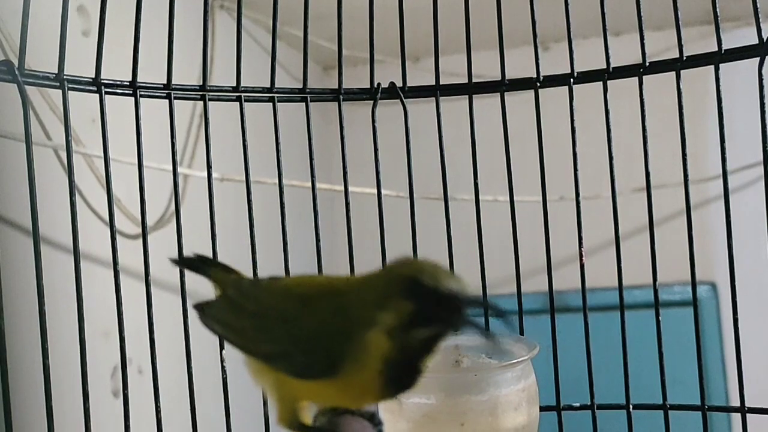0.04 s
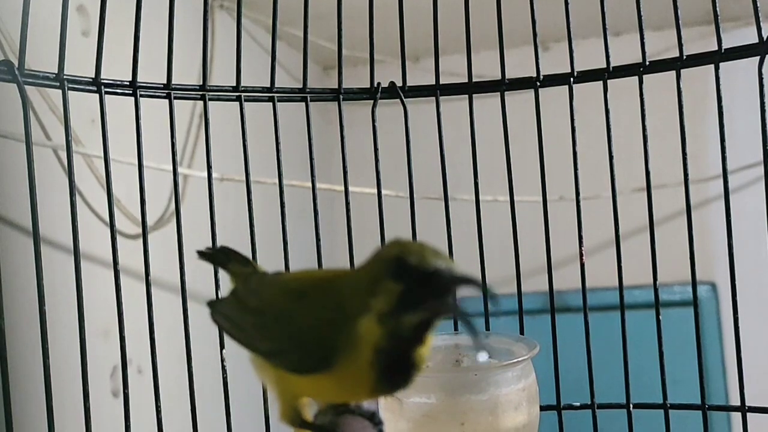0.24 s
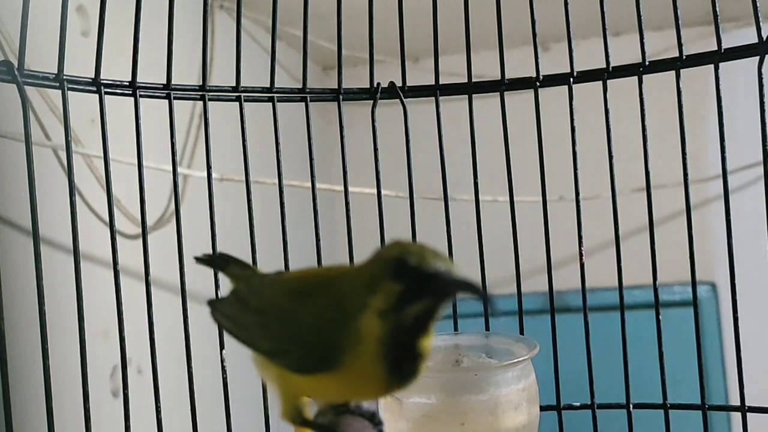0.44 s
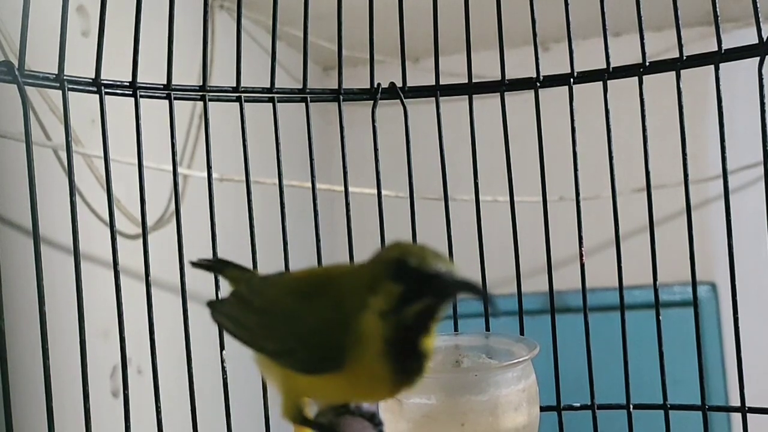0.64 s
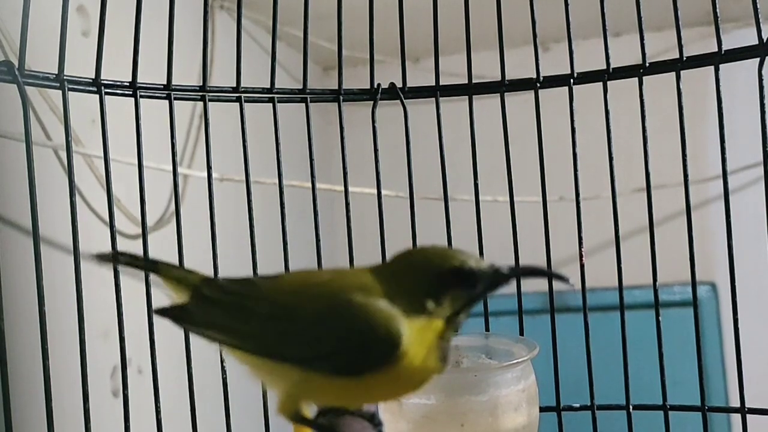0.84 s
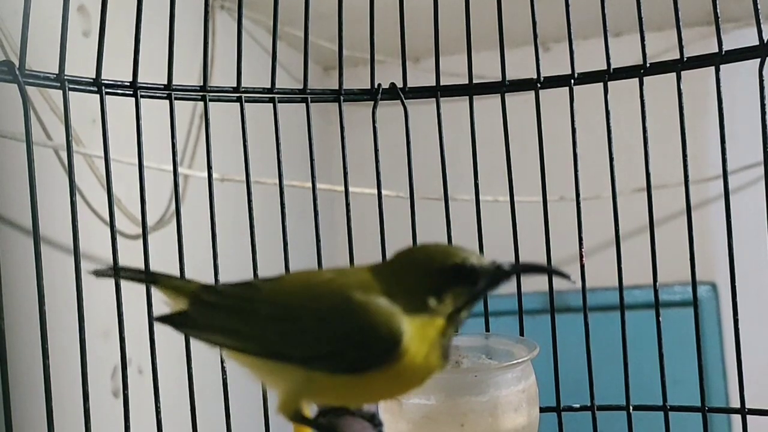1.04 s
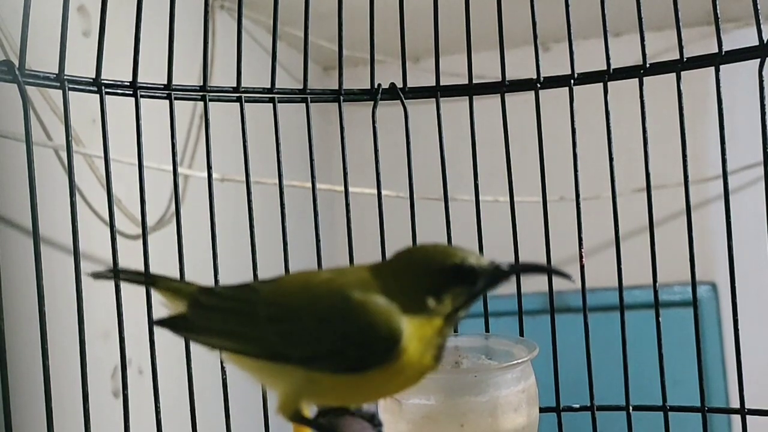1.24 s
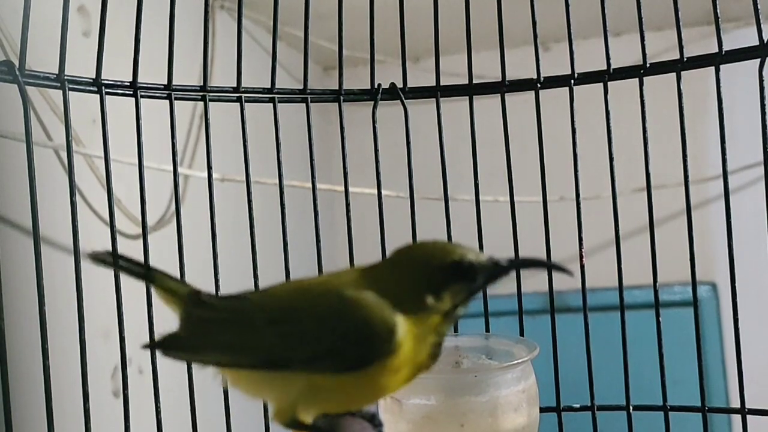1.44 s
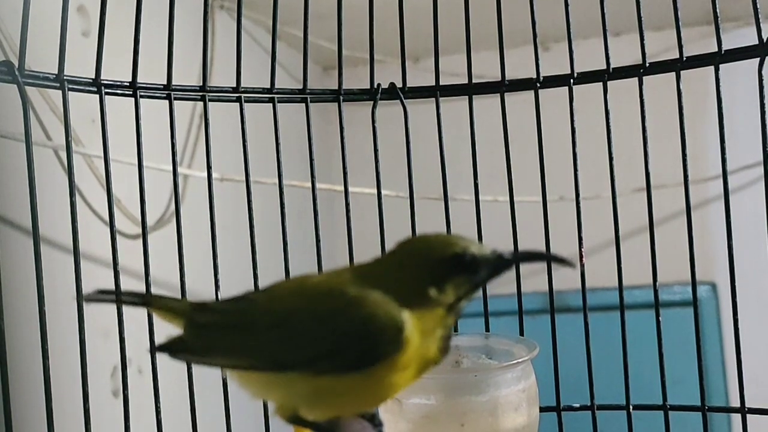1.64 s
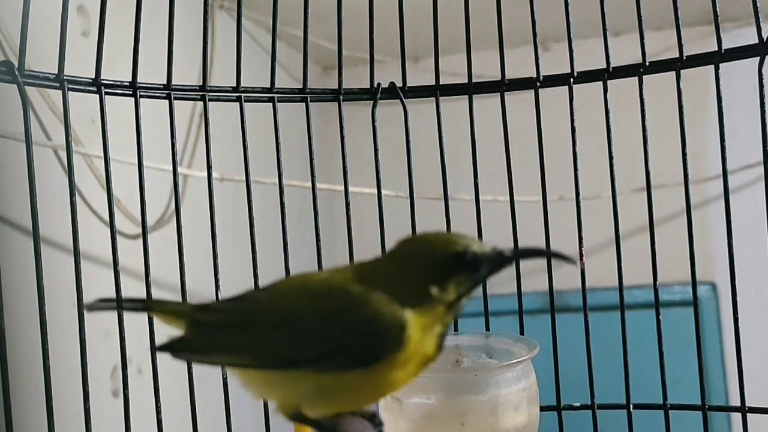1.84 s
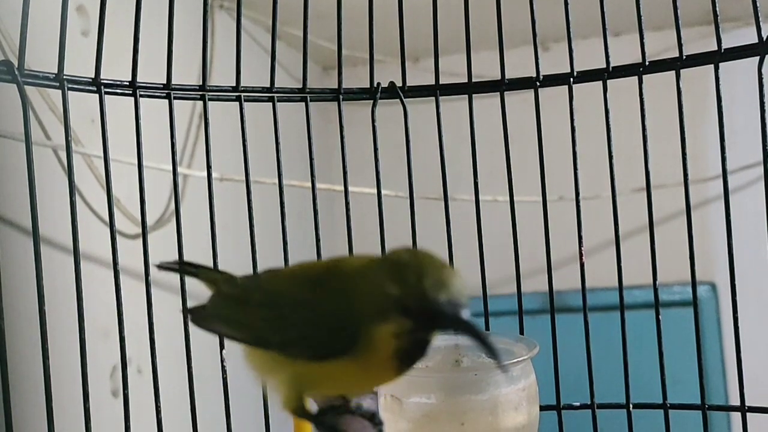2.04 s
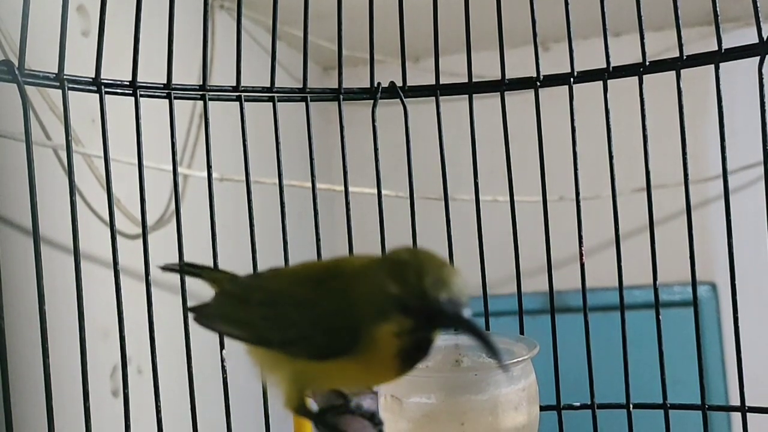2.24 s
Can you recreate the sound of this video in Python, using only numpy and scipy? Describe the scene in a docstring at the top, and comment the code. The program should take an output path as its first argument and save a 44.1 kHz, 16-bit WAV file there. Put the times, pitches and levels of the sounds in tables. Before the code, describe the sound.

Small caged bird squawks harshly once, pauses, then utters a loose string of quick falling chips

```python
"""Over room air and a low hum, thin faint whistles begin, and more come later between and over the chips.
Two tiny snaps lead into a caged sunbird's loud squawk: partials shaken into a rasp, clearer in the middle.
After a pause come nine short chips, each opening with rasping noise and turning into a falling tone.
A small hard-walled room adds early echoes and a fading tail to every bird note and whistle."""
import sys
import numpy as np
from scipy import signal
from scipy.fft import rfft, irfft, next_fast_len
from scipy.io import wavfile
from scipy.ndimage import uniform_filter1d, map_coordinates

SR = 44100
rng = np.random.default_rng(int(sys.argv[2]) if len(sys.argv) > 2 else 0)


def wrap_up_sound(samples):
    """Save the sound to the file named by the first command line argument, as 16-bit audio."""
    columns = np.atleast_2d(samples).T
    # keep every value between -1 and 1, then stretch to whole-number steps
    tamed = np.clip(columns, -1, 1)
    steps = np.round(tamed * 32767).astype(np.int16)
    wavfile.write(sys.argv[1], SR, steps)


N = 99225  # samples: 2.25 s


def amp(db):
    """Decibels to a plain factor."""
    return 10 ** (np.asarray(db) / 20)


def unit(x):
    """Scale x to an average strength (rms) of 1."""
    return x / np.sqrt(np.mean(x ** 2) + 1e-20)


def along(points, hz):
    """Read a curve of (frequency, value) points, with frequency on a log axis."""
    f, v = np.transpose(points)
    return np.interp(np.log(hz + 1), np.log(f + 1), v)


def clock():
    """The time of every sample in seconds."""
    return np.arange(N) / SR


def curves(rows):
    """One value per sample for each column after the time."""
    s, *cols = np.transpose(rows)
    return [np.interp(clock(), s, c) for c in cols]


def ramp(u):
    """A smooth step from 0 to 1."""
    return np.sin(np.pi / 2 * np.clip(u, 0, 1)) ** 2


def wobble(rate):
    """A smooth random curve through rate random points a second."""
    knots = rng.standard_normal(int(N * rate / SR) + 4)
    return map_coordinates(knots, [clock() * rate])


def filtered(x, response):
    """Change the strength and phase of each frequency in x by a response."""
    m = next_fast_len(N + SR // 2)
    hz = np.fft.rfftfreq(m, 1 / SR)
    return irfft(rfft(x, m) * response(hz), m)[..., :N]


def noise(spectrum):
    """Noise coloured by a (frequency, dB) curve, at rms 1."""
    return unit(filtered(rng.standard_normal(N), lambda hz: amp(along(spectrum, hz))))


def partials(pitch, multiples, gains, throat):
    """The voice organ's tone at rms 1: the throat weighs each partial at its momentary frequency."""
    phase = 2 * np.pi * np.cumsum(pitch) / SR
    k = multiples[:, None]
    below_limit = k * pitch < SR / 2
    weight = gains * amp(along(throat, k * pitch)) * below_limit
    return (weight * np.sin(k * phase)).sum(0) / np.sqrt((weight ** 2).sum(0) / 2)


def squawk():
    """Harsh at both ends, where every partial is shaken into a band; clears in the middle as the pitch arches."""
    # pitch of the voice: start_s, pitch_hz
    pitch_points = [(.235, 1640), (.29, 1655), (.312, 1820), (.328, 1844), (.338, 1946), (.37, 1973),
                    (.39, 2047), (.415, 2066), (.44, 2015), (.465, 1863), (.49, 1778)]
    # loudness of the voice: start_s, level_db
    level_points = [(.223, -59), (.231, -26.5), (.24, -17), (.286, -17), (.305, -20), (.345, -12.5),
                    (.372, -19.5), (.414, -15.5), (.455, -20), (.478, -19), (.493, -28), (.5, -55)]
    # roughness: start_s, rasp_over_tone_db, half_pitch_partials_db
    rough_points = [(.235, 12, -28), (.26, 7, -19.5), (.288, -2, -20.5), (.305, 5.5, 12), (.325, -8.5, 0),
                    (.35, -28.5, -54.5), (.385, -15.5, -6.5), (.408, -11, -12), (.435, 5.5, -8),
                    (.465, 2, -9), (.49, -1.5, -7)]
    # throat and open beak, for the tone: frequency_hz, gain_db
    tone_throat = [(900, -84.5), (1900, -18.5), (2600, -13.5), (3100, -3), (3500, -6), (3900, 11.5),
                   (4200, -2), (5000, 9.5), (6200, 3.5), (7000, -18), (8200, -29.5), (10000, -35),
                   (15000, -36.5)]
    # throat and open beak, for the rasp: frequency_hz, gain_db
    rasp_throat = [(300, -54.5), (1200, -32), (2000, -22.5), (2500, -15), (3200, -30), (3800, -7.5),
                   (5000, 0.5), (6000, -4), (6800, -8.5), (7500, -23.5), (9000, -42.5), (15000, -45)]
    jitter_share = 0.0201  # pitch unsteadiness at full roughness
    spread_hz, rasp_half_db = 620, -2  # how fast partials are shaken; half-pitch partials in the rasp

    (pitch,), (level_db,) = curves(pitch_points), curves(level_points)
    rasp_db, half_db = curves(rough_points)
    rough = amp(rasp_db) / np.hypot(1, amp(rasp_db))
    multiples = np.arange(1, 19) / 2
    halves = multiples[:, None] % 1 > 0
    shaky_pitch = pitch * (1 + jitter_share * rough * wobble(1500))
    tone = partials(shaky_pitch, multiples, np.where(halves, amp(half_db), 1), tone_throat)

    phase = 2 * np.pi * np.cumsum(pitch) / SR
    shaken = []
    for k in multiples:
        shake = wobble(spread_hz) + 1j * wobble(spread_hz)
        shaken.append(np.real(shake * np.exp(1j * k * phase)))
    mixed = (np.array(shaken) * np.where(halves, amp(rasp_half_db), 1)).sum(0)
    harsh = filtered(mixed, lambda hz: amp(along(rasp_throat, hz)))
    # The voice organ swings with bounded strength: even out the power over about 4 ms.
    harsh = harsh / np.sqrt(np.abs(uniform_filter1d(harsh ** 2, size=180)))
    sounding = (clock() > level_points[0][0]) & (clock() < level_points[-1][0])
    return sounding * amp(level_db) * (np.sqrt(1 - rough ** 2) * tone + rough * harsh)


def ticks():
    """Two tiny snaps as the voice catches: coloured noise that starts at once and dies fast."""
    # first snaps of the voice organ: start_s, level_db
    snaps = [(0.2243, -24), (0.2289, -36.5)]
    # colour of the snaps: frequency_hz, gain_db
    snap_colour = [(400, -26.5), (1400, -2), (2800, -11.5), (5500, 8), (7000, -4.5), (9000, -46.5),
                   (15000, -38)]
    t60_s = 0.021  # time to fade by 60 dB
    envelope = np.zeros(N)
    for start, level_db in snaps:
        age = np.abs(clock() - start)
        envelope += (clock() > start) * amp(level_db - 60 * age / t60_s)
    return envelope * noise(snap_colour)


def rasp(spectrum, flutter_hz, depth):
    """Chaotic motion of the voice organ: noise in fast uneven bursts."""
    uneven_hz = flutter_hz * (1 + .3 * wobble(200))
    beat = np.sin(2 * np.pi * np.cumsum(uneven_hz) / SR)
    return unit(noise(spectrum) * (1 + depth * beat))


def chips():
    """Each chip opens with a rasp, then locks into a tone whose steep fall eases into a steady slide."""
    # the chips: start_s, length_s, middle_of_fall_s (after the start), fall_time_s,
    # first_pitch_hz, last_pitch_hz (both before the steady slide),
    # level_db, rasp_db, octave_db (second partial), treble_db
    chip_rows = [ (0.99, .041, 0.024, 0.01186, 1740, 1508, -42.5, 5, -8, -5.5),
                 (1.115, 0.043, 0.027, .018, 3900, 2265, -33, -9, 3.5, -7.5),
                 (1.246, 0.042, .021, .010, 2576, 1712, -30.5, -7.5, 1.5, -4),
                 (1.423, 0.033, .021, .024, 2300, 1578, -25.5, -10, 3, -1.5),
                 (1.512, 0.043, .019, 0.0068, 2700, 2022, -24, -6, 7, -4.5),
                 (1.61, .032, .023, .016, 2450, 1844, -26.5, -6.5, 3.5, -2.5),
                 (1.801, 0.038, 0.022, 0.01806, 3083, 1554, -31.5, 1, 0, 2),
                 (1.865, .040, 0.026, 0.00736, 1972, 1665, -26.5, -3, 2.5, -5.5),
                 (2.061, 0.035, 0.025, 0.015, 2100, 1782, -26, -6, 1.5, 1.5)]
    # throat, for the tone: frequency_hz, gain_db
    tone_throat = [(1300, -8.5), (1800, -9), (2500, -6.5), (3300, -2), (4100, -4), (4900, -5),
                   (5800, -14.5), (7000, -22.5), (8500, -34), (11000, -31), (15000, -35)]
    # throat, for the rasp: frequency_hz, gain_db
    rasp_throat = [(400, -32), (1100, -39.5), (1700, -4), (3200, 5.5), (4300, 4), (5800, -6.5),
                   (7500, -24.5), (10000, -25), (12500, -31), (15000, -35)]
    attack_s, release_s = .009, .012
    tone_start, tone_rise = 0.27, 0.41  # shares of the length: when the tone sets in, how long it takes
    rasp_left = 0.35  # share of the rasp that stays under the tone
    jitter_share = .024  # pitch unsteadiness
    sag_hz_per_s = 3200  # steady slide under the main fall
    treble_hz = 6480  # the treble change is complete here and begins at half of this
    grain_db, grain_hz = 1.5, 494.4  # fast uneven flutter of the tone

    out = np.zeros(N)
    grit = rasp(rasp_throat, flutter_hz=412.2, depth=0.77)
    jitter = wobble(1800)
    grain = unit(amp(grain_db * wobble(grain_hz)))
    multiples = np.arange(1, 10)
    for start, length, middle, fall, first_hz, last_hz, level_db, rasp_db, octave_db, treble_db in chip_rows:
        span = slice(int(start * SR), int((start + length + release_s) * SR))
        t = clock()[span]
        from_middle = t - start - middle
        still_high = (1 - np.tanh(2 * from_middle / fall)) / 2
        pitch = last_hz + (first_hz - last_hz) * still_high - sag_hz_per_s * from_middle
        gains = np.where(multiples[:, None] == 2, amp(octave_db), 1)
        tone = partials(pitch * (1 + jitter_share * jitter[span]), multiples, gains, tone_throat)

        locked = ramp(((t - start) / length - tone_start) / tone_rise)
        rise = np.clip((t - start) / attack_s, 0, 1)
        fade = ramp((start + length - t) / release_s + .5)
        rasp_share = 1 - locked * (1 - rasp_left)
        chip = locked * grain[span] * tone + amp(rasp_db) * rasp_share * grit[span]
        hz = np.fft.rfftfreq(len(t), 1 / SR)
        shelf = amp(treble_db * ramp(hz / treble_hz * 2 - 1))
        out[span] += amp(level_db) * rise * fade * irfft(rfft(chip) * shelf, len(t))
    return out


def whistles():
    """Thin, soft, nearly level tones: single sine waves that swell and fade."""
    # the whistles: start_s, length_s, first_pitch_hz, last_pitch_hz, level_db, unsteadiness (share of pitch)
    whistle_rows = [(0.023, 0.13, 5180, 5140, -73, .006), (0.048, 0.25, 9250, 9230, -76.5, 0.0087),
                    (0.871, 0.089, 5380, 5620, -58, 0.0071), (0.929, 0.06, 5640, 5820, -63.5, 0.0081),
                    (.94, 0.072, 3780, 4140, -67, 0.012), (1.022, 0.072, 4354, 4244, -56, 0.0059),
                    (1.465, .06, 5750, 5764, -51.5, 0.063), (1.621, 0.064, 5660, 5650, -43, 0.03)]
    out = np.zeros(N)
    for start, length, first_hz, last_hz, level_db, unsteady in whistle_rows:
        u = np.clip((clock() - start) / length, 0, 1)
        pitch = (first_hz + (last_hz - first_hz) * u) * (1 + unsteady * wobble(700))
        swell = np.sqrt(2 * np.abs(np.sin(np.pi * u)))
        out += amp(level_db) * swell * np.sin(2 * np.pi * np.cumsum(pitch) / SR)
    return out


def background():
    """Room air, partly alike left and right in the bass, with a low drone and a deep, almost steady hum."""
    # colour of the room air: frequency_hz, level_db (per Hz)
    air_colour = [(15, -31), (25, 3.5), (67, -6.5), (176, -11), (354, -7.5), (833, -12.5), (2180, -18.5),
                  (3350, -22), (4500, -24.5), (5140, -23.5), (7680, -39), (9270, -48), (15000, -88)]
    # loudness of the air and drone: start_s, level_db
    air_level = [(0, -54.5), (.45, -54.5), (.6, -61), (.75, -60.5), (.9, -56.5), (1.5, -55.5), (2.25, -53)]
    # how alike left and right are: frequency_hz, likeness (0 to 1)
    alike = [(50, 0.38), (300, 0.63), (700, 0.0033), (2000, 0)]
    # colour of the room's low drone: frequency_hz, gain_db
    drone_colour = [(120, -80.5), (200, -17.5), (268, -4), (305, -13), (350, -0.5), (450, -46.5),
                    (900, -88)]
    air_low_hz, drone_db = 70, -9.5  # bass roll-off of the air; drone against the air
    hum_hz, hum_db = 48.2, -60.5
    waver_db, drift_rad = .7, .1  # slight unsteadiness of the hum's level and phase

    def mid_side(hz):
        """Shares of the common and the opposite part that give the wanted likeness."""
        turn = np.arccos(np.clip(along(alike, hz), -1, 1)) / 2
        return np.array([np.cos(turn), np.sin(turn)])

    mid, side = filtered(np.array([noise(air_colour), noise(air_colour)]), mid_side)
    stereo = unit(np.array([mid + side, mid - side]))
    air = filtered(stereo, lambda hz: hz / np.hypot(hz, air_low_hz))
    hum_level = np.sqrt(2) * amp(hum_db + waver_db * wobble(5.13))
    hum = hum_level * np.sin(2 * np.pi * hum_hz * clock() + drift_rad * wobble(10))
    drone = amp(drone_db) * noise(drone_colour)
    return amp(curves(air_level)[0]) * (air + drone) + hum


def in_room(x, room_db, pan_db, lead_s):
    """Direct sound, louder and earlier on the left if asked, plus early wall echoes and the room's tail."""
    # how long the tail rings: frequency_hz, t60_s (time to fade by 60 dB)
    ring_times = [(300, 0.95), (2000, 0.32), (5000, 0.32), (8000, 0.45), (15000, 0.1)]
    wall_db, wall_t60_s = -13, .06  # early echoes of the near walls
    hz, t, z = signal.stft(rng.standard_normal((2, SR // 2)), SR, nperseg=256)
    decay = amp(-60 * t / along(ring_times, hz)[:, None])
    tail = signal.istft(z * decay, SR, nperseg=256)[1]
    age = np.arange(tail.shape[1]) / SR
    walls = rng.standard_normal(tail.shape) * amp(-60 * age / wall_t60_s) * ramp(age / 0.001)
    tail = tail * ramp(age / 0.004)
    tail_part = amp(room_db) * tail / np.linalg.norm(tail[0])
    wall_part = amp(wall_db) * walls / np.linalg.norm(walls[0])

    sides = np.array([[1], [-1]])  # left, right
    # Each side takes half of the level difference and half of the time lead.
    direct = filtered(x, lambda f: amp(sides * pan_db / 2) * np.exp(1j * np.pi * f * lead_s * sides))
    return direct + signal.fftconvolve(x[None], tail_part + wall_part, axes=1)[:, :N]


def scene():
    """Bird and whistles in the room, over the background; the bird reaches the left side first."""
    loud_call = in_room(squawk() + ticks(), room_db=-14, pan_db=2.2, lead_s=.000156)
    short_calls = in_room(chips(), room_db=-9.5, pan_db=1, lead_s=.000116)
    thin_tones = in_room(whistles(), room_db=-7, pan_db=0, lead_s=0)
    return loud_call + short_calls + thin_tones + background()


def record(dry):
    """Keep nothing at or above the band limit of 15900 Hz."""
    return filtered(dry, lambda hz: hz < 15900)


dry = scene()
out = record(dry)
wrap_up_sound(out)
```